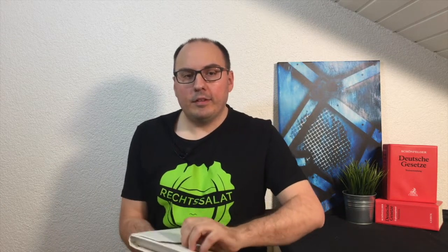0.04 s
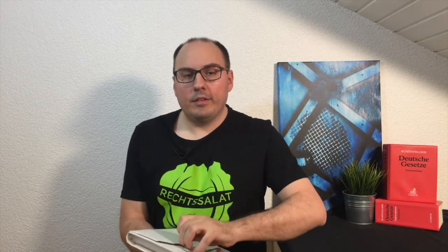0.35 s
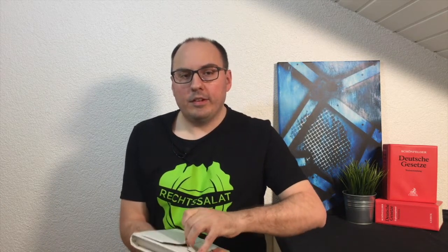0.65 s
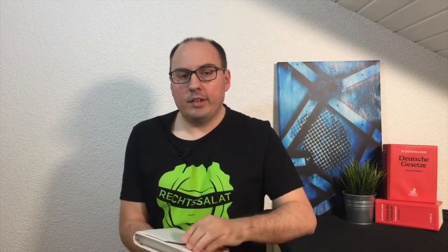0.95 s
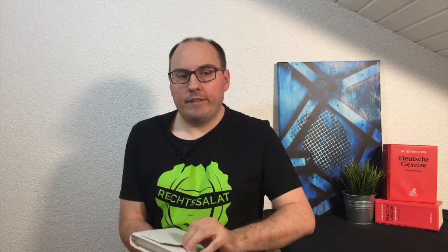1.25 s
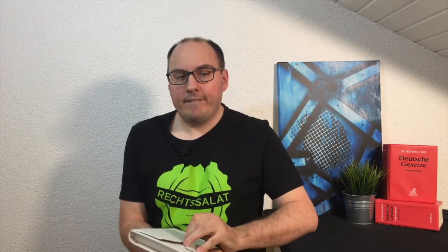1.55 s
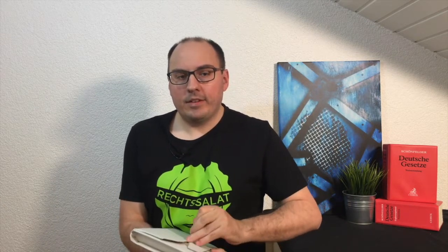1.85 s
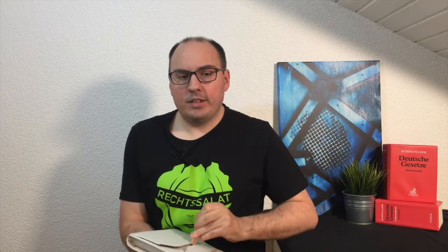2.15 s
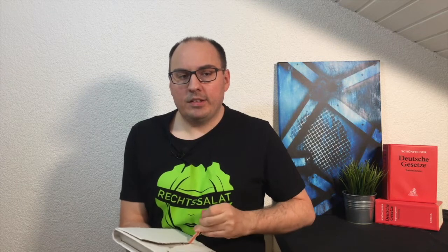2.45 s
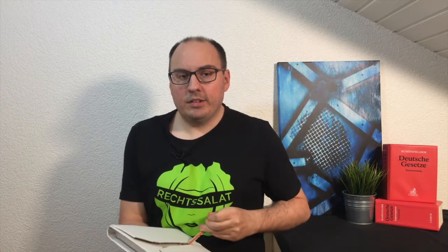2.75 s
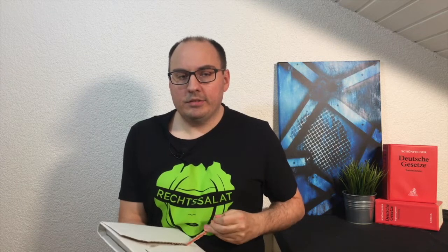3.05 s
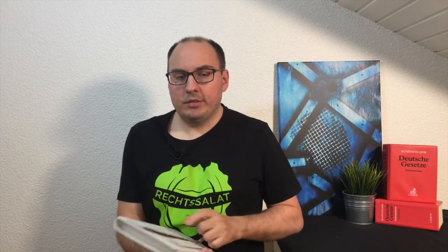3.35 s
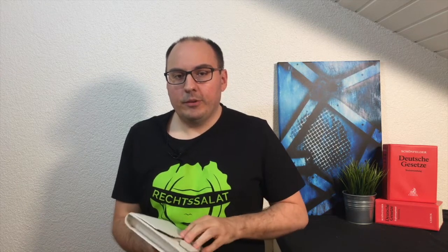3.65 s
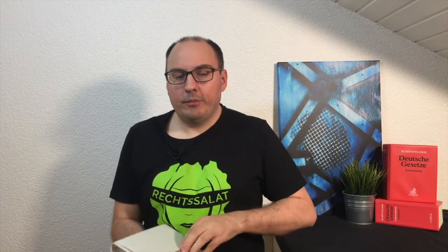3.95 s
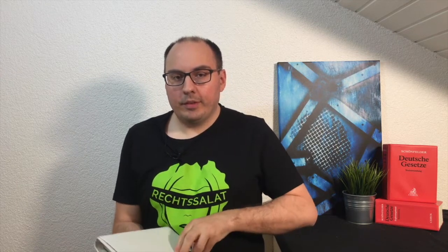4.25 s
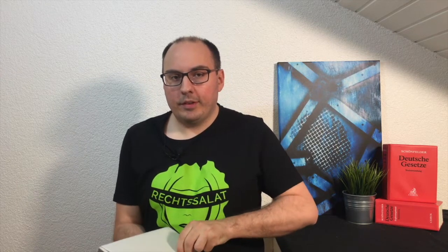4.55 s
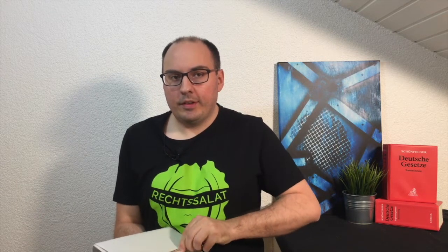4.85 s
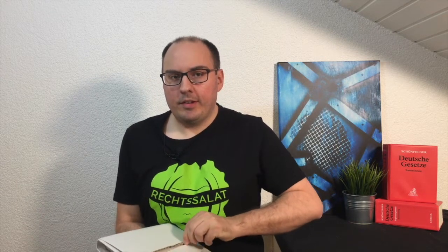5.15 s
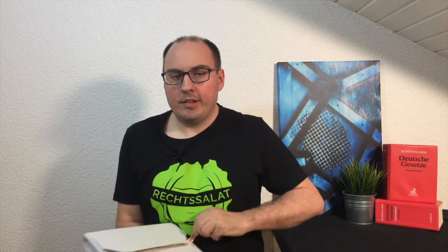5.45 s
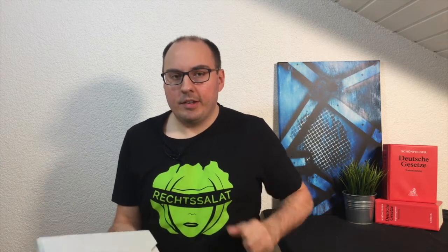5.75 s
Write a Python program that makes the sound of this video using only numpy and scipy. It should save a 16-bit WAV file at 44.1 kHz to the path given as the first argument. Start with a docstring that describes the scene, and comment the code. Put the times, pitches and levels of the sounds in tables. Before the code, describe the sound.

Close to a single microphone in a small, quiet room, a cardboard mailing box is opened by hand. Soft scraping and small crackling rips build to sharp snaps, then the tear strip gives way in a stutter of hollow, crunchy thumps. A quieter pause holds rubbing, light taps, a slide across the table and tiny lip clicks. Finally the strip rips again in a quick burst of tighter, higher pops.

```python
"""The tear strip of a cardboard mailer comes away in two runs of jerks, each thumping the flap like a drum skin.
Around it, fingers rub the card and pick at the tab, and fibres rip in showers or snap one by one.
Between the runs the box is turned, tapped and slid on the table; its hollow ring gives the sounds their body.
A few small clicks in that pause are probably from the mouth.
All of it is close to one microphone in a small, quiet room."""
import sys
import numpy as np
from scipy import signal
from scipy.io import wavfile
from scipy.ndimage import uniform_filter1d

SR = 44100
rng = np.random.default_rng(int(sys.argv[2]) if len(sys.argv) > 2 else 0)


def unload_audio(sound):
    """Save the sound as a 16-bit wav file, at the path given as the first command line argument."""
    columns = np.transpose(np.atleast_2d(sound))
    # keep every value between -1 and 1, then stretch to whole-number steps
    steps = np.round(np.clip(columns, -1, 1) * 32767)
    wavfile.write(sys.argv[1], SR, steps.astype(np.int16))


N = 255325
TIME = np.arange(N) / SR

# Cue levels are relative within each layer.
# strokes of skin over card: start/s, end/s, start level/dB, end level/dB, brightness/dB
STROKES = [(0.0, 0.17, -45.5, -67.5, -2), (0.187, 0.277, -53.5, -51, -5.5), (0.304, 0.383, -56, -61.5, -1),
           (0.488, 0.613, -60.5, -62, -2), (0.717, 0.845, -66, -53, 1.5), (0.932, 1.065, -59, -58.5, -0.5),
           (1.114, 1.25, -56, -51.5, -2), (1.427, 1.535, -80, -53, 6.5), (1.62, 1.73, -56, -51.5, 3),
           (1.892, 1.929, -60, -49.5, 2.5), (2.02, 2.1, -54, -64, 0), (2.262, 2.383, -64, -67.5, 4),
           (3.067, 3.413, -70.5, -57, -1.5), (3.427, 3.847, -53.5, -54, -0.5),
           (3.911, 4.198, -56.5, -59.5, -3), (4.204, 4.275, -56.5, -59.5, -0.5),
           (4.296, 4.417, -61.5, -55, -3.5), (4.48, 4.646, -65.5, -63.5, -6),
           (4.691, 4.946, -55.5, -62.5, -1.5), (4.964, 5.07, -60, -59, -1.5), (5.093, 5.177, -71, -58, -2),
           (5.563, 5.707, -60, -63.5, 5.5)]
# fibre bundles tearing: peak t/s, level/dB, brightness/dB, spread/s, run-on/s
FIBRE_RIPS = [(0.01, -49, 3, 0.013, 0), (0.28, -50, 14.5, 0.0044, 0.012), (0.305, -41, 8.5, 0.0039, .012),
              (0.624, -37, 2.5, 0.0088, 0.013), (0.662, -24, 2.5, 0.0094, 0.0081),
              (1.219, -30.5, -1.5, 0.0027, 0.0012), (1.24, -47.5, 1.5, 0.017, 0.052),
              (1.317, -37, 0, 0.011, 0.0076), (1.346, -25.5, -6, 0.0073, 0.0088),
              (1.363, -35, -0.5, 0.0062, 0.026), (1.552, -35, 2, 0.011, 0.0076),
              (1.582, -26.5, -2.5, 0.011, 0.011), (1.708, -38, 0, 0.0057, 0.049),
              (1.745, -19, -3.5, 0.0043, 0), (1.772, -34, 0, 0.0078, 0.038), (1.926, -30, -2, 0.012, .038),
              (1.977, -19, -13, 0.0034, 0), (1.998, -35, -2, 0.0034, 0.0093), (2.117, -43.5, 0, 0.012, 0),
              (2.167, -31.5, -1.5, 0.0052, 0.083), (2.437, -38, -12, 0.0052, .03),
              (4.389, -50, -2, 0.0073, 0), (5.028, -47, 0, 0.013, 0.023), (5.218, -33, 1, 0.0077, 0.0064),
              (5.253, -39, 1, .0086, 0), (5.468, -32.5, 8.5, 0.0046, 0.0053),
              (5.474, -36.5, 6.5, 0.016, 0.019)]
# how hard a rip drives the walls, more as the pull runs deeper into the card: t/s, level/dB
WALL_DRIVE = [(0.3, -11), (0.66, -8), (1.22, -16.5), (1.35, -6.5), (1.92, -3.5), (2.2, 4.5), (5.0, -5),
              (5.22, -6)]
# fingers and edges tapping the box: t/s, level/dB
BOX_TAPS = [(0.064, -44.5), (0.181, -47), (0.193, -47), (0.483, -44.5), (0.555, -49), (0.568, -55),
            (0.809, -45), (0.836, -40.5), (0.933, -50), (0.968, -43.5), (3.427, -45), (3.437, -41.5),
            (4.575, -48.5), (4.675, -46), (5.629, -49.5)]
# the moving box pushes air: t/s, level/dB, half length/s
AIR_PUSHES = [(0.06, -33.5, 0.0059), (0.125, -42.5, 0.037), (3.429, -36.5, 0.0026), (3.762, -34, 0.012),
              (5.546, -32, 0.0056)]
# short dry clicks: card snapping, and probable mouth clicks at 3.24, 4.32 and 4.42 s:
# t/s, level/dB, centre f/Hz
DRY_CLICKS = [(0.1925, -41, 1650), (0.52, -43, 9600), (0.6027, -37.5, 8400), (0.932, -43, 3320),
              (1.0382, -38, 8100), (1.154, -37.5, 8000), (1.108, -51, 3300), (1.203, -38, 3960),
              (1.4615, -43, 6740), (1.5713, -23.5, 5760), (1.742, -16.5, 4260), (1.9161, -11, 7400),
              (1.9173, -12.5, 4170), (1.9723, -11.5, 3800), (2.8565, -39, 2770), (3.2429, -34, 3900),
              (3.2989, -40.5, 6660), (3.3377, -45.5, 2480), (4.2046, -46, 3680), (4.324, -38.5, 8300),
              (4.4174, -30, 7700), (4.5784, -38.5, 3880), (4.674, -44, 3020), (5.6588, -41, 4300)]
# quick runs of tiny ticks: fingertip judder, and a probable lip smack at 3.12 s:
# start/s, end/s, tick rate/Hz, level/dB, centre f/Hz
TICK_RUNS = [(0.216, 0.308, 115, -41.5, 1730), (0.534, 0.611, 130, -50.5, 10000),
             (1.23, 1.298, 110, -38.5, 3200), (3.124, 3.155, 180, -55.5, 3330),
             (4.971, 5.076, 170, -44, 3260)]
# the tear strip lets go: t/s, level/dB, flap f/Hz
STRIP_TUGS = [(2.3915, -28.5, 396), (2.4258, -21.5, 277), (2.4378, -27, 330), (2.4472, -27, 391),
              (2.4642, -26, 370), (2.4722, -19.5, 276), (2.4961, -21, 280), (2.5197, -21.5, 258),
              (2.539, -24.5, 402), (2.5605, -19.5, 286), (2.5898, -20.5, 380), (2.6406, -11, 333),
              (2.6986, -17.5, 275), (2.8041, -21.5, 266), (2.8803, -17.5, 278), (2.926, -14.5, 283),
              (2.9432, -19, 270), (2.977, -14, 290), (2.9992, -17, 286), (5.141, -28, 505),
              (5.1873, -8.5, 645), (5.228, -11.5, 625), (5.2723, -12, 610), (5.296, -15.5, 575),
              (5.3256, -9.5, 654), (5.37, -16.5, 546), (5.4166, -17, 520), (5.4642, -14.5, 714)]
# the box drags on the table: t/s, drone level/dB, rasp level/dB
SLIDE_LEVELS = [(3.6, -82, -79), (3.72, -57, -54.5), (3.86, -79, -70), (3.93, -75, -51.5),
                (4.08, -50.5, -64), (4.2, -108, -71)]

# resonances of the hollow box and of the card's stiff face: f/Hz, level/dB, t60/s
BOX_MODES = [(160, -8, 0.1), (198, -16.5, 0.066), (274.6, -2, 0.077), (319, -5.5, 0.12), (410, -18, 0.17),
             (455.4, -0.5, 0.062), (587, -2, 0.077), (662, -18.5, 0.09), (720, -6, 0.061),
             (775, -5.5, 0.062), (897, 2, 0.026), (996, -0.5, 0.057), (1148, -13.5, 0.13),
             (1655, -16.5, 0.12), (1900, -21, .16)]
CARD_MODES = [(2760, 8, 0.003), (5720, -1.5, 0.015), (7800, 6, 0.0024)]
# EQ curves: f/Hz, level/dB
WALL_EQ = [(60, -26.5), (150, -10), (260, -7), (340, -2.5), (405, 5), (475, -2), (600, -9.5), (730, 2),
           (950, -10), (1500, -7), (2200, -27), (5000, -66.5)]  # hollow body of the box
HISS_EQ = [(2500, -23.5), (4000, -2), (5200, -4), (6600, 0.5), (8200, -1), (10500, -4), (13000, -7),
           (16000, -8)]  # airy top of a stroke
SCRAPE_EQ = [(500, -4), (1200, 5), (1900, 1), (2900, 0.5), (4200, -3.5), (5500, -5.5), (9000, -43)]  # coarse mids of a stroke
BITE_EQ = [(90, -16.5), (500, -7), (1000, -4.5), (1500, -1), (2000, -3), (2750, -1), (3600, -4), (4300, -5),
           (5200, -7.5), (6300, -22.5), (9000, -24)]  # midrange of a rip
SIZZLE_EQ = [(3500, -73.5), (5600, -6), (7400, -2.5), (8600, 0.5), (10300, -3.5), (11700, -7.5),
             (13000, -9), (16000, -9)]  # treble of a rip
SLACK_CRUNCH_EQ = [(70, -33), (400, 5.5), (1000, -4), (1600, -5), (2400, 2), (3000, 0.5), (3900, -3),
                   (5200, -6.5), (7500, -5), (10000, -7), (13000, -9), (16000, -8)]  # fibres breaking on a slack flap
TAUT_CRUNCH_EQ = [(400, -11.5), (1000, 11), (1400, -1), (2000, -4), (2900, 1.5), (4000, -0.5), (5200, 1.5),
                  (7500, -3), (9500, -3), (12000, -11.5), (16000, -13)]  # and on a taut one
ROOM_TONE_EQ = [(10, 14), (25, 6), (60, -9), (130, -18.5), (300, -15.5), (600, -26.5), (1500, -35.5),
                (3000, -32), (8000, -42.5), (16000, -43.5)]  # steady background, mostly rumble
# decay of the room: f/Hz, t60/s
ROOM_DECAY = [(150, 0.16), (400, 0.15), (1000, 0.33), (2800, 0.2), (7000, 0.24), (15000, 0.2)]


def amp(db):
    """Decibels to gain."""
    return 10 ** (np.asarray(db) / 20)


def unit(x):
    """Scales to rms 1."""
    return x / np.sqrt(np.mean(x ** 2) + 1e-20)


def along(points, hz):
    """Reads a curve on a log-frequency axis."""
    f, value = np.transpose(points)
    return np.interp(np.log(hz + 1), np.log(f), value)


def convolve(x, response):
    """Plays x through an impulse response scaled to unit energy."""
    return signal.oaconvolve(x, response / np.linalg.norm(response))[:N]


def eq(x, curve, size=4096):
    """Minimum-phase EQ of unit energy in the shape of the curve."""
    log_gain = np.log(amp(along(curve, abs(np.fft.fftfreq(size, 1 / SR)))))
    response = np.fft.ifft(np.exp(np.conj(signal.hilbert(log_gain)))).real
    return convolve(x, response[:size // 2])


def band(x, low_hz, high_hz):
    """Band-pass filter."""
    edges = [min(low_hz, SR / 4), min(high_hz, SR / 3)]
    return signal.sosfilt(signal.butter(2, edges, "bandpass", fs=SR, output="sos"), x + 1e-15)


def add(mix, s, sound):
    """Mixes a sound in from time s on."""
    start = round(s * SR)
    part = mix[max(start, 0):max(start + len(sound), 0)]
    part += sound[max(-start, 0):][:len(part)]


def swell(t, rise_s, fall_s):
    """Exponential attack and decay, peaking at t = 0."""
    return np.exp(-np.minimum(np.maximum(-t / rise_s, t / fall_s), 20))


def grains(per_s, spread_db, smooth, window):
    """Grit: tiny uneven fractures over smooth friction noise, levelled to about rms 1."""
    clicks = (rng.random(N) < per_s / SR) * rng.choice([-1, 1], N)
    clicks = clicks * amp(spread_db * np.minimum(rng.exponential(1, N), 4))
    grit = unit(clicks) + smooth * rng.standard_normal(N)
    return grit / np.sqrt(abs(uniform_filter1d(grit ** 2, window)) + 1e-6)


def box_ring(uneven_db=5):
    """One knock on the box; each spot struck balances the modes a little differently."""
    t = np.arange(SR // 4) / SR
    ring = np.zeros(len(t))
    for k, (hz, db, t60) in enumerate(BOX_MODES):
        decay = amp(db + uneven_db * rng.standard_normal() - 60 * t / t60)
        ring += (-1) ** k * decay * np.sin(2 * np.pi * hz * t)
    return ring / abs(ring).max()


def walls(x, ring_db=-12):
    """Friction shakes the walls of the box: partly at once, partly ringing in its modes."""
    return eq(x + amp(ring_db) * convolve(x, box_ring(uneven_db=3.5)), WALL_EQ)


def flap(t, hz, t60, load=0.58):
    """A panel is loaded, lets go a quarter of a swing before t = 0 and swings out."""
    quarter_s = 1 / (4 * hz)
    free_s = np.maximum(t + quarter_s, 0)
    swing = np.sin(2 * np.pi * hz * free_s) * amp(-60 * (free_s - quarter_s) / t60)
    return load * swell(t + quarter_s, 0.00098, 0.0003) - swing


def rubs(attack_s=0.026, release_s=0.028, flutter_db=1.34, nicks_per_s=34, nick_s=0.0007, nick_db=-10):
    """Skin catches and slips on the grain of the card: fine hiss, coarser scrape and hollow body."""
    levels = np.zeros((3, N))
    for start, end, start_db, end_db, bright_db in STROKES:
        attack = np.clip((TIME - start) / attack_s + 0.5, 0, 1)
        release = np.exp(-np.clip((TIME - end) / release_s, 0, 20))
        pressure = attack * release * amp(np.interp(TIME, [start, end], [start_db, end_db]))
        balance = amp([-2 + bright_db, -1.5, -9.5 - bright_db])  # a bright stroke trades body for hiss
        levels += np.outer(balance, pressure)
    # finger pressure flutters, and now and then the skin nicks a ridge
    flutter = amp(flutter_db * unit(uniform_filter1d(rng.standard_normal(N), size=400)))
    ridges = rng.random(N) < nicks_per_s / SR
    nicks = signal.lfilter([1], [1, -np.exp(-1 / (nick_s * SR))], ridges + 1e-12)
    grip = flutter + amp(nick_db) * unit(nicks)
    hiss, scrape, body = (level * grip * grains(1200, 1.7, smooth=1, window=1500) for level in levels)
    return eq(hiss, HISS_EQ) + eq(scrape, SCRAPE_EQ) + walls(body)


def rips(catches_per_s=70.3, catch_db=-7, sizzle_db=-3):
    """Showers of breaking fibres crackle with bite and sizzle, and shake the walls of the box."""
    layers = np.zeros((3, N))
    t = np.arange(-SR // 10, SR // 4) / SR
    fibres = np.array([grains(1800, 3.2, smooth=0.57, window=400) for _ in layers])
    for s, db, bright_db, spread_s, run_s in FIBRE_RIPS:
        offset = rng.integers(N - len(t))
        shower = fibres[:, offset:offset + len(t)].copy()
        # each taut bundle twangs at its own pitches, one in the bite and one in the sizzle
        for k, hz in enumerate([rng.uniform(2240, 4550), rng.uniform(6240, 14900)]):
            shower[k] = unit(shower[k] + band(shower[k], hz * 0.95, hz * 1.05))
        # fast attack, a run that catches and gives way by turns, then a tail
        fade = np.where(t < 0, (t / spread_s) ** 2, np.maximum(t - run_s, 0) / (1.69 * spread_s))
        catches = amp(catch_db * np.sin(np.pi * catches_per_s * np.clip(t, 0, run_s)) ** 2)
        envelope = np.exp(-np.minimum(fade, 20)) * catches
        sends_db = [0, sizzle_db + bright_db, np.interp(s, *np.transpose(WALL_DRIVE))]
        for layer, grit, send_db in zip(layers, shower, sends_db):
            add(layer, s + t[0], amp(db + send_db) * envelope * grit)
    bite, sizzle, body = layers
    return eq(bite, BITE_EQ) + eq(sizzle, SIZZLE_EQ) + amp(-3) * walls(body)


def handling():
    """The moving box pushes soft puffs of air; dull taps ring it and nudge it as a whole."""
    out = np.zeros(N)
    t = np.arange(-SR // 10, SR // 10) / SR
    for s, db, half_s in AIR_PUSHES:
        puff = -t / half_s * np.exp((1 - (t / half_s) ** 2) / 2)
        add(out, s + t[0], amp(db) * puff)
    knock = amp(7) * flap(t, hz=464, t60=0.012)
    thud = amp(-7) * flap(t, hz=115, t60=0.03)
    for s, db in BOX_TAPS:
        add(out, s + t[0], amp(db) * (knock + thud))
        add(out, s, amp(db) * box_ring())
    return out


def dry_click(db, hz):
    """A broad noise burst about a millisecond long, with a faint tail."""
    t = np.arange(SR // 50) / SR
    burst = rng.choice([-1, 1], len(t)) * (np.exp(-t / 0.00048) + 0.11 * np.exp(-t / 0.0041))
    width = np.clip(7 + 0.15 * db, 1.45, 4)  # louder clicks have a wider band
    width = 1 + (width - 1) * min(1, 4500 / hz)  # the highest ones a narrower one
    click = band(burst, hz / width, min(hz * width, 12500))
    return amp(db) * click / np.sqrt(np.mean(click[:SR // 1000] ** 2))


def clicks_and_ticks():
    """Card snaps, fingertip judder and a few probable mouth sounds; hard snaps ring the card's face."""
    direct, card_send = np.zeros((2, N))
    for s, db, hz in DRY_CLICKS:
        click = dry_click(db, hz)
        add(direct, s, click)
        add(card_send, s, amp(db - 11) * click)  # the louder the click, the larger its share of ring
    for start, end, per_s, db, hz in TICK_RUNS:
        for s in np.arange(start, end, 1 / per_s):
            add(direct, s + rng.normal(0, 0.087) / per_s, dry_click(db + rng.normal(0, 1.4), hz))
    t = np.arange(SR // 50) / SR
    ring = sum(amp(db - 60 * t / t60) * np.cos(2 * np.pi * hz * t) for hz, db, t60 in CARD_MODES)
    return amp(-1) * direct + convolve(card_send, ring)


def tear_strip(loose_hz=285, loose_t60=0.028, deadening=2.23, usual_tug_db=-21.5):
    """The strip loads the flap until a row of fibres breaks; the flap springs back and the box rings."""
    thumps, slack, taut = np.zeros((3, N))
    t = np.arange(-SR // 100, SR // 10) / SR
    crunch_shape = swell(t, 0.00042, 0.00081) + 0.16 * swell(t, 0.0043, 0.0091)
    for s, db, hz in STRIP_TUGS:
        # held tighter, the flap sounds higher and deader, rings the box less and tears more brightly
        tension = np.clip((hz - 400) / 100, 0, 1)
        t60 = loose_t60 * (loose_hz / hz) ** deadening
        add(thumps, s + t[0] + 0.00011, amp(db - 1) * flap(t, hz, t60))
        add(thumps, s + 0.0011, amp(db - 9 - 5 * tension) * box_ring())
        crunch_db = -24.5 + 0.39 * (db - usual_tug_db) + tension  # grows more slowly than the thump
        for layer, share in [(slack, 1 - tension), (taut, tension)]:
            add(layer, s - 0.0007 + t[0], np.sqrt(share) * amp(crunch_db) * crunch_shape)
    fibres = grains(7000, 3.4, smooth=0.52, window=150)
    crunch = eq(slack * fibres, SLACK_CRUNCH_EQ) + eq(taut * fibres, TAUT_CRUNCH_EQ)
    return band(thumps, 116, 7100) + crunch  # a small panel radiates little bass


def slide(drone_hz=(77, 92), rasp_hz=(540, 920)):
    """The whole box trembles as it slides, and its bottom gives a hollow rasp."""
    times, *curves = np.transpose(SLIDE_LEVELS)
    out = np.zeros(N)
    for db, edges in zip(curves, [drone_hz, rasp_hz]):
        fader = amp(np.interp(TIME, times, db, left=-np.inf, right=-np.inf))
        out += fader * unit(band(rng.standard_normal(N), *edges))
    return out


def room(x, echoes_per_s=5000, predelay_s=0.003, build_s=0.0057):
    """Near surfaces answer within milliseconds; then a short tail dies band by band."""
    size = SR // 2
    echoes = rng.standard_normal(size) * (rng.random(size) < echoes_per_s / SR)
    hz, t, spectrum = signal.stft(echoes, SR, nperseg=256)
    decay = amp(-60 * t / along(ROOM_DECAY, hz)[:, None])
    tail = signal.istft(spectrum * decay, SR, nperseg=256)[1][:size]
    fade_in = np.clip((TIME[:size] - predelay_s) / build_s, 0, 1)
    return convolve(x, tail * fade_in)


def scene():
    """Four close layers, each with its reverb send, over faint room tone; both channels alike."""
    strip, tearing, clicks = tear_strip(), rips(), clicks_and_ticks()
    hands = handling() + rubs() + slide()
    reverb = room(amp(-10) * strip + amp(-13.5) * tearing + amp(-12.5) * clicks + amp(-13) * hands)
    room_tone = amp(-53) * unit(eq(rng.standard_normal(N), ROOM_TONE_EQ, size=16384))
    return np.tile(strip + tearing + clicks + hands + reverb + room_tone, (2, 1))


def record(dry, bounce_s=0.0003857, bounce_db=-12, ceiling=0.85, cutoff_hz=16100):
    """A surface just behind the microphone ripples the treble; overload clips; the top is cut off."""
    bounce = np.array([np.interp(TIME - bounce_s, TIME, channel) for channel in dry])
    clipped = np.clip(dry + amp(bounce_db) * bounce, -ceiling, ceiling)
    low_pass = signal.firwin(511, cutoff_hz, window=("kaiser", 9), fs=SR)
    return signal.oaconvolve(clipped, low_pass[None], "same")


dry = scene()
out = record(dry)
unload_audio(out)
```